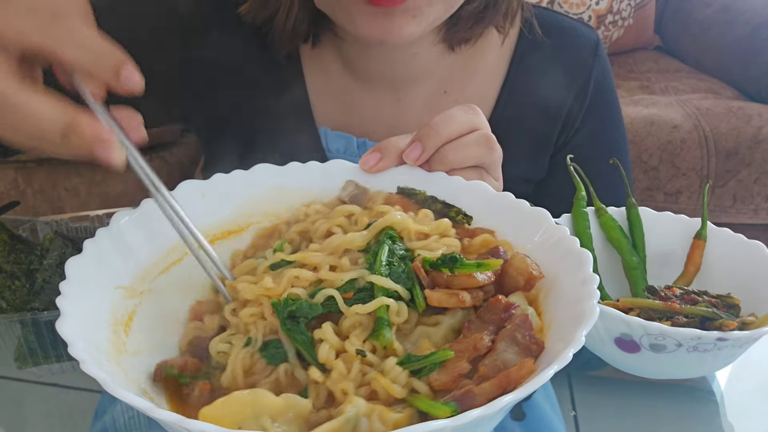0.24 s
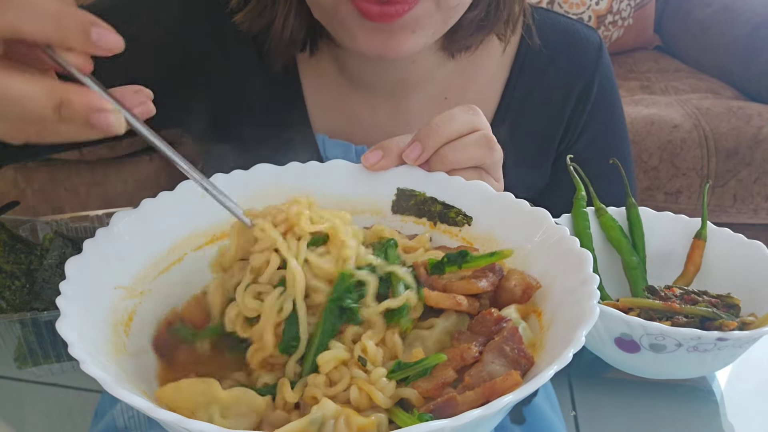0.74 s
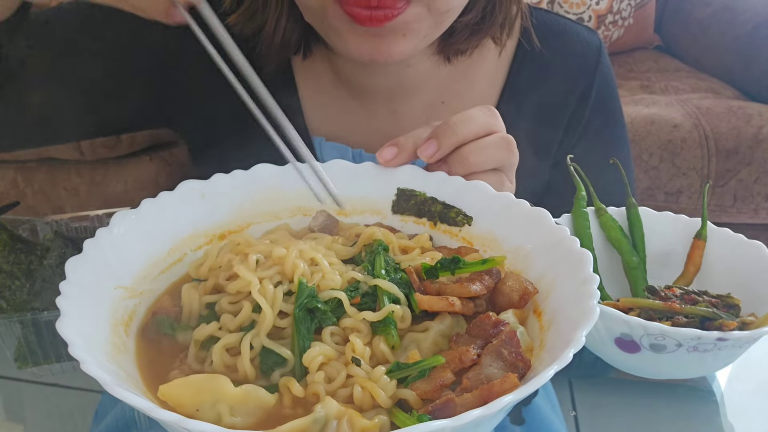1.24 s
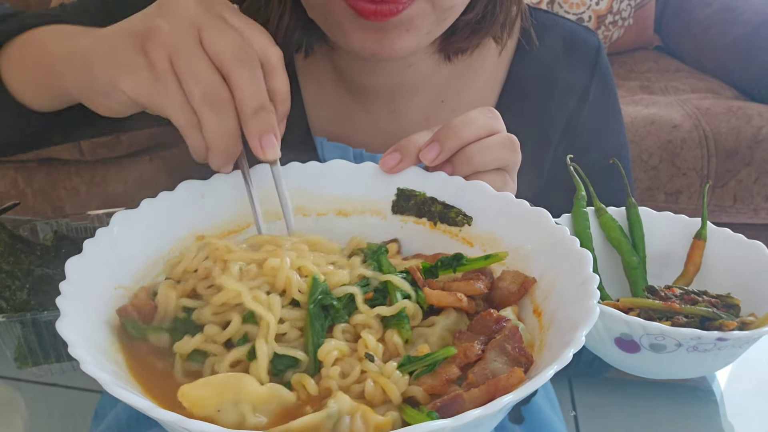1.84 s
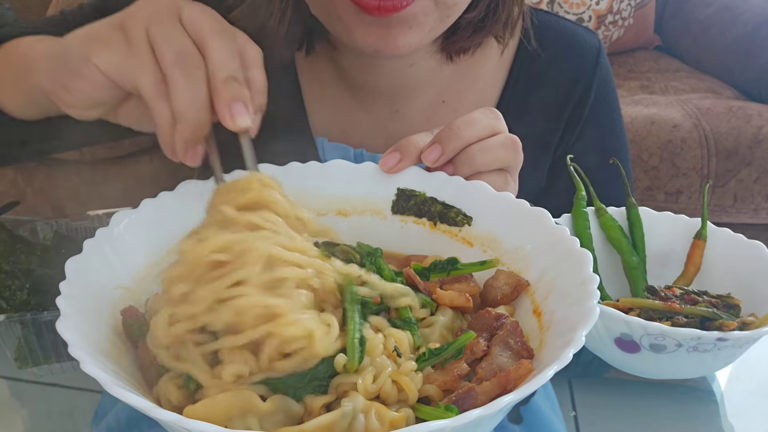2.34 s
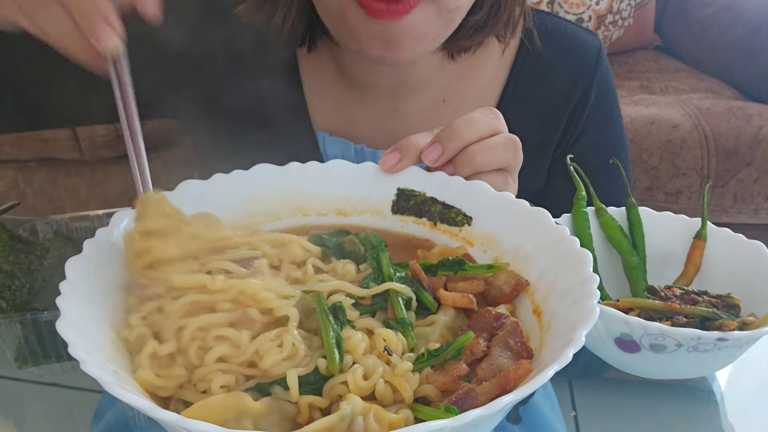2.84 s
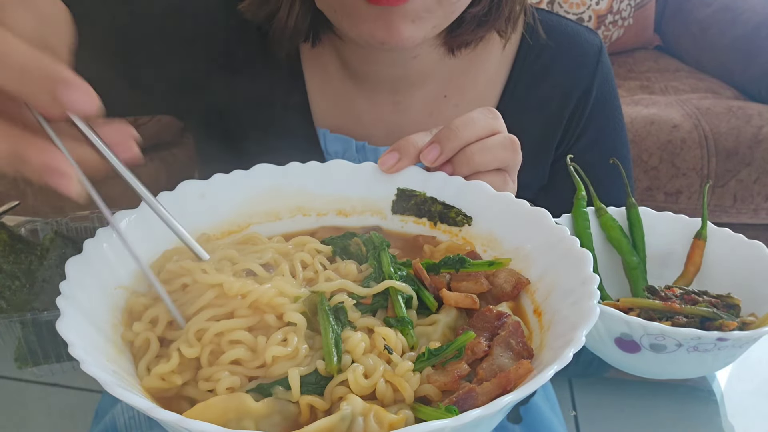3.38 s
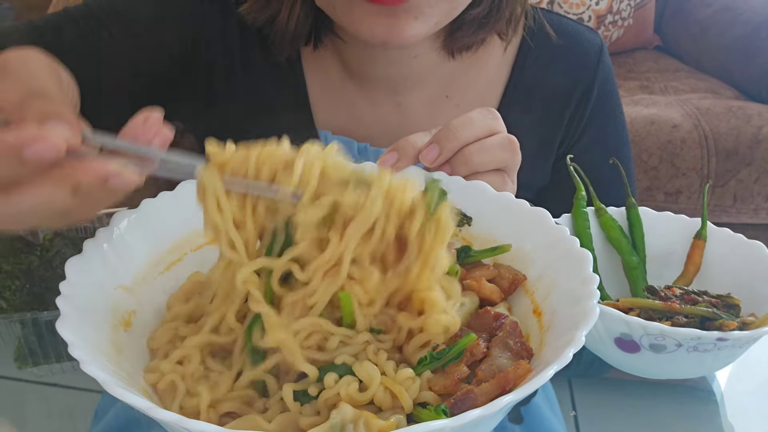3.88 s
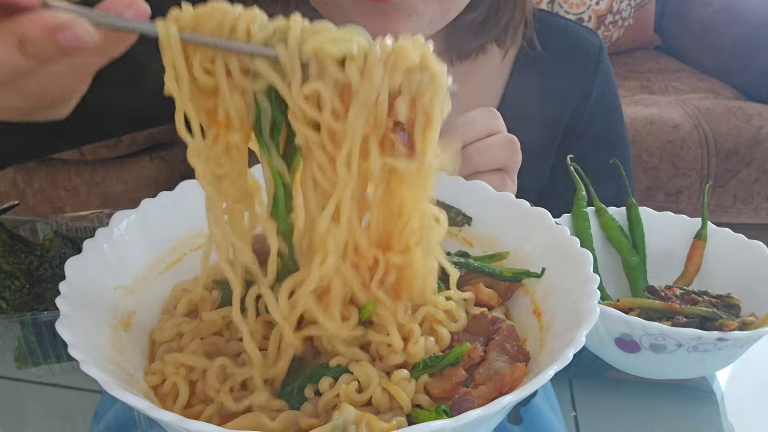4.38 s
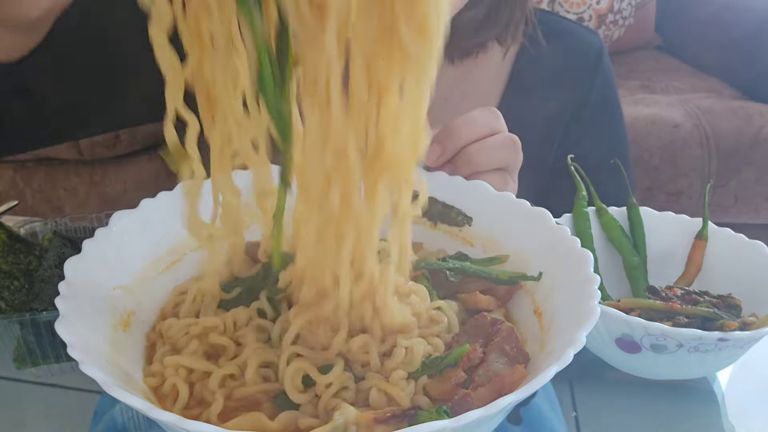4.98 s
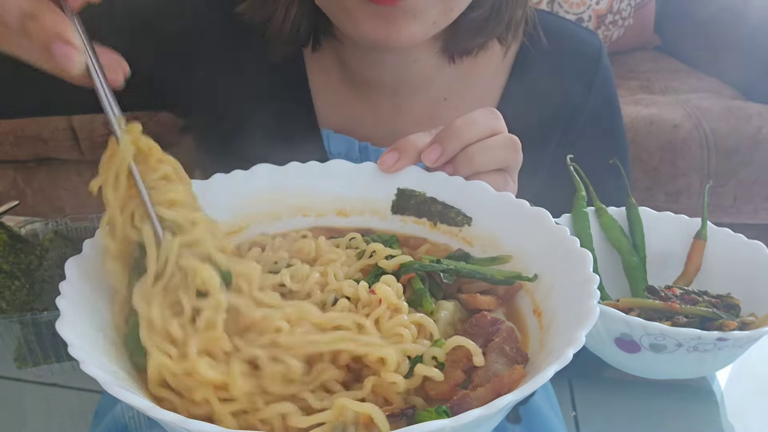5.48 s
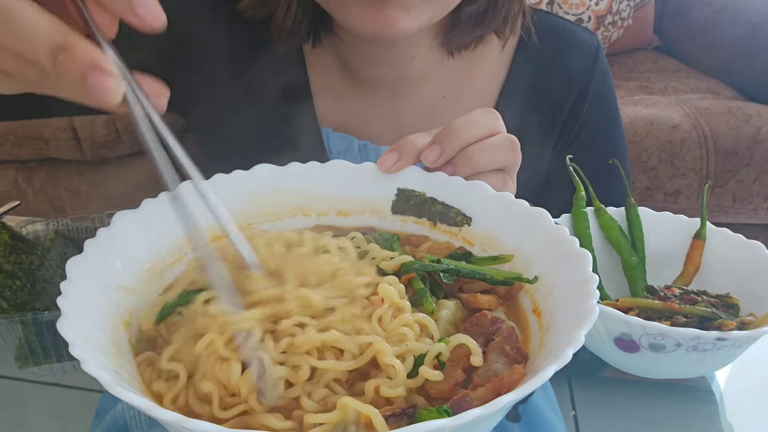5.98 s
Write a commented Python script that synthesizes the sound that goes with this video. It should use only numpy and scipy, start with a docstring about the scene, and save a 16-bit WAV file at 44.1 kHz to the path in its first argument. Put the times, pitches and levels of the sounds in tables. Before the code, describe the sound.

Metal chopsticks clink and scrape a thin bowl while wet noodles pop, tick and rustle close up, over a low room hum.

```python
"""Steel chopsticks knock and slide on a thin glass-ceramic bowl, heard by a pair of close microphones in a living room.
Each touch sets off the bowl's ringing modes, and short noise adds its crack or scratch. Wet noodles pop, tick
and rustle as they part: small air cavities ring briefly over fine random clicks. Shaped noise makes the rumble,
hum and hiss below; they step up in level part way through. A cloud of echoes adds the room."""
import sys
import numpy as np
from scipy import signal
from scipy.fft import rfft, irfft
from scipy.io import wavfile
from scipy.ndimage import uniform_filter1d

SR = 44100
rng = np.random.default_rng(int(sys.argv[2]) if len(sys.argv) > 2 else 0)


def nominal_scale(level):
    """Amplitude ratio for a level in decibels (scalar or array-like)."""
    x = np.asarray(level, float) / 20
    return 10 ** x


def file_out(sig):
    """Save sig as 16-bit WAV at sys.argv[1]."""
    # one column per channel
    cols = np.atleast_2d(sig).T
    # limit, then scale
    lim = np.clip(cols, -1, 1)
    pcm = np.round(lim * 32767).astype(np.int16)
    wavfile.write(sys.argv[1], SR, pcm)


N = 274302  # length in samples

# Knocks of a tip on the bowl; the levels are relative:
# start_s, ring_level_db, left_minus_right_db, crack_db (added to ring_level_db for the crack)
KNOCKS = [(0.2379, -24, -3, -2), (0.3052, -44, -7, 2), (0.3344, -48, -2, -13), (0.3662, -58, -6, -6),
          (1.3154, -23, 5.5, -4), (1.3274, -23, 0, 3.5), (1.3828, -44, -8, 3), (1.4496, -38.5, 1, 9.5),
          (3.4241, -30, 1.5, 5), (6.0352, -15.5, -3.5, -5.5)]


def rms_one(x):
    """Scales a sound so that its average (rms) level is 1."""
    return x / np.sqrt(np.mean(x ** 2) + 1e-20)


def at_hz(points, hz):
    """Reads a curve between its points, along a logarithmic pitch axis."""
    point_hz, value = np.array(points).T
    return np.interp(np.log(hz + 1), np.log(point_hz), value)


def sides(left_minus_right_db):
    """Left and right gains that share out a level difference between the ears."""
    return nominal_scale(np.array([left_minus_right_db, -left_minus_right_db]) / 2)


def grains(per_s, spread_db):
    """Random clicks of uneven size, separate ones in each ear."""
    clicks = (rng.random((2, N)) < per_s / SR) * rng.choice([-1, 1], (2, N))
    extra_db = spread_db * np.minimum(rng.exponential(1, (2, N)), 4)
    return clicks * nominal_scale(extra_db)


def stereo_noise(level_db):
    """Noise of a given spectrum, mostly shared by the ears in the bass and less alike above."""
    # How alike the ears are: pitch_hz, likeness (1 = same, 0 = unrelated, -1 = opposite)
    likeness = [(60, 0.96), (130, 1), (290, 0.96), (640, 0.39), (1410, 0.25), (3100, 0.2), (6820, -0.61),
                (15000, 0.31)]
    # Balance between the ears: pitch_hz, left_minus_right_db
    lean = [(60, -0.5), (130, -3.5), (290, -1.5), (640, -6), (1410, -3), (3100, -3), (6820, -5.5),
            (15000, 7.5)]
    left_lag_s = 0.00019
    hz = np.arange(N // 2 + 1) * SR / N
    mid, side = rfft(rng.standard_normal((2, N)))
    alike = at_hz(likeness, hz)
    pair = np.sqrt(1 + alike) * mid + np.sqrt(1 - alike) * side * [[1], [-1]]
    pair[0] *= np.exp(-2j * np.pi * hz * left_lag_s)
    return irfft(pair * sides(at_hz(lean, hz)) * nominal_scale(level_db(hz)), N)


def background():
    """Rumble and hum share one noise lifted at the room's resonances; a thin hiss lies above."""
    # Broad shape of rumble and hum: pitch_hz, relative_level_db (per Hz)
    hum_shape = [(15, -63), (25, -14.5), (53, 13), (107, -1), (152, -6.5), (256, -1.5), (339, -15),
                 (378, -13.5), (559, -17), (665, -26), (1140, -18), (1450, -27.5), (1930, -26.5),
                 (3040, -38.5), (4500, -63), (5850, -79.5), (9900, -120)]
    # Room resonances: pitch_hz, width_hz, lift_db
    room_peaks = [(51.6, 21, 4), (98.4, 6, 12.5), (121.8, 8.7, 9.5), (240, 25, 0), (322.3, 10, 9.5),
                  (374.4, 14.3, 8.5), (1105, 140, 2.5), (1890, 150, 1)]
    # Shape of the hiss: pitch_hz, relative_level_db (per Hz)
    hiss_shape = [(2060, -24), (3500, 6), (6870, -5), (8240, -1), (10100, -6), (14800, 0), (16100, -8),
                  (16500, -27)]
    step_s, step_blend_s = 2.745, 0.0071  # middle of the level step, and half its length
    split_hz = 175  # rumble below, hum above
    dip_depth_db, dip_width_s = 15, 0.045  # the rumble dips briefly at the step
    since_step_s = np.arange(N) / SR - step_s

    def stepped(before_db, after_db):
        return np.interp(since_step_s, [-step_blend_s, step_blend_s], [before_db, after_db])

    def spectrum(hz):
        lift_db = sum(db / (1 + (2 * (hz - peak_hz) / width_hz) ** 2) for peak_hz, width_hz, db in room_peaks)
        return at_hz(hum_shape, hz) + lift_db

    both = stereo_noise(spectrum)
    rumble = signal.sosfiltfilt(signal.butter(2, split_hz, fs=SR, output="sos"), both)
    hum = both - rumble
    hiss = stereo_noise(lambda hz: at_hz(hiss_shape, hz))
    dip_db = dip_depth_db * np.exp(-(since_step_s / dip_width_s) ** 2)
    rumble = nominal_scale(stepped(-50, -45) - dip_db) * rms_one(rumble)
    hum = nominal_scale(stepped(-49, -43)) * rms_one(hum)
    hiss = nominal_scale(stepped(-78, -71)) * rms_one(hiss)
    return rumble + hum + hiss


def room(x):
    """A dying cloud of echoes, unrelated in the two ears."""
    t60_s, level_db = 0.33, -15  # t60 is the time in which a sound dies by 60 dB
    t = np.arange(SR // 2) / SR
    tail = rng.standard_normal((2, len(t))) * nominal_scale(-60 * t / t60_s)
    tail = tail * (t > 0.004)  # a short gap before the first echoes
    tail = tail / np.sqrt(np.sum(tail ** 2, axis=1, keepdims=True))
    return nominal_scale(level_db) * signal.fftconvolve(x, tail, axes=1)[:, :N]


def pop(hz, t60_s):
    """A film snaps, and the small cavity of air behind it rings a few cycles, climbing in pitch."""
    rise, open_s = 0.062, 0.00015  # strength of the climb; time over which the ring opens
    snap_db, snap_s = -16, 0.00018
    t = np.arange(512) / SR
    ring = np.sin(2 * np.pi * hz * t * (1 + rise * t / t60_s))
    ring = ring * nominal_scale(-60 * t / t60_s) * (1 - np.exp(-t / open_s))
    snap = np.diff(nominal_scale(snap_db - 60 * t / snap_s), prepend=0)
    return ring + snap


def noodles():
    """Parting wet noodles give clear pops, fainter ticks at random pitches and a fine wet rustle."""
    # The clearest pops: start_s, level_db (before scattering), start_pitch_hz, t60_s, left_minus_right_db
    pops = [(0.1087, -30.5, 8600, 0.00088, -7), (.132, -33.5, 4560, 0.0018, 1),
            (.515, -32, 14800, .0009, 8), (0.55, -41, 9610, 0.0021, 8), (0.797, -40, 6200, 0.0019, 3),
            (.859, -39, 9190, 0.0014, -4), (.8803, -46, 4990, .0022, 12), (1.05, -35, 7760, 0.00081, 1),
            (1.82, -44, 7500, .0056, -1), (1.8416, -25, 9760, 0.00041, 9), (1.9324, -42, 6800, .0016, -3),
            (2.0855, -38, 10040, .0011, 14), (2.3419, -43, 9220, 0.0016, -6),
            (2.644, -32, 9620, 0.00061, 5), (2.7587, -19, 4430, 0.00047, 3),
            (2.7861, -40, 2800, 0.0032, -1), (2.8645, -38, 2900, 0.0027, 1), (2.946, -37, 5030, .0032, 10),
            (2.9548, -41, 9800, 0.0017, 12), (3.043, -33, 5230, 0.0023, -6),
            (3.1853, -45, 4060, .0051, -13), (3.2331, -34.5, 3800, 0.0023, 6), (3.244, -38, 4970, .0024, 7),
            (3.254, -39, 5340, 0.0027, -2), (3.2914, -34, 5800, 0.0019, -6), (3.351, -29, 12400, .0013, 12),
            (3.406, -38, 11010, .0016, 6), (3.508, -35, 4680, .003, -2), (3.525, -34.5, 5440, 0.0027, -1),
            (3.5545, -41, 5430, .0025, -9), (3.6617, -32, 8300, 0.0012, 0), (3.7376, -34, 9700, 0.0018, 9),
            (3.8005, -34, 13220, .0011, 9), (3.832, -18.5, 11400, 0.00038, 9),
            (3.8759, -37, 7400, .0023, 6), (3.9347, -29, 11400, 0.00082, 3),
            (3.9649, -36, 11580, .0011, 10), (4.007, -32, 12510, 0.0013, 10),
            (4.022, -28, 9400, 0.00072, -4), (4.133, -32.5, 9900, 0.0017, 12),
            (4.1594, -34, 14820, .0015, 7), (4.455, -44, 8360, .0046, -11), (4.4905, -35, 8060, 0.0043, -9),
            (4.6735, -32, 12700, 0.0013, 18), (4.7616, -39, 8930, 0.0012, 6), (4.897, -38, 8250, .0012, 2),
            (5.034, -38, 4520, .0016, 2), (5.0601, -40, 4460, 0.0027, 7), (5.1663, -32, 7600, 0.0016, -4),
            (5.2099, -40.5, 9600, .0024, 15), (5.225, -34, 6170, .0021, 9), (5.2387, -38, 8270, .0021, -8),
            (5.272, -36, 7850, 0.0043, -10), (5.3257, -26, 13300, 0.00077, 5),
            (5.369, -29, 10100, .00093, 8), (5.5109, -35, 13800, 0.0019, 14),
            (5.768, -35, 13680, .0014, 12), (5.7835, -36, 13550, 0.0012, 10),
            (5.9199, -35, 5440, .0068, -5), (5.9722, -34, 13100, 0.0015, 7)]
    # How busily the noodles are stirred: time_s, rustle_level_db
    stirring = [(0, -74), (.25, -82), (.55, -75.5), (.92, -75), (1.1, -98), (1.8, -74.5), (2.15, -78),
                (2.7, -83), (3.0, -72), (3.14, -84), (3.27, -75.5), (3.6, -65.5), (4.15, -73), (4.35, -76),
                (4.7, -71.5), (5.12, -79), (5.2, -62.5), (5.5, -66), (5.6, -80), (5.8, -76), (6.22, -73)]
    usual_ticks_per_s, usual_stir_db = 260, -77.5
    rate_follows, size_follows = 0.7, 0.31  # share of the rustle's swing in dB
    tick_db, tick_spread_db, tick_cycles = -63, 6, 12.7
    high_left_db = 5.5  # per octave: higher ticks lean left
    scatter_share, scatter_s = 0.42, 0.018  # part of the power lost into the tangle, and its t60
    stir_s, stir_db = np.transpose(stirring)
    rustle_db = np.interp(np.arange(N) / SR, stir_s, stir_db)
    ticks_per_s = usual_ticks_per_s * nominal_scale(rate_follows * (rustle_db - usual_stir_db))

    rows = [tuple(row) for row in pops]
    draws = rng.random((5000, 6))  # possible ticks; a busier rustle keeps more of them
    for when, keep, size, pitch, side, short in draws:
        i = int(when * N)
        if keep < ticks_per_s[i] * N / SR / len(draws):
            hz = 4300 * 3.6 ** (pitch ** 0.8)
            db = tick_db + size_follows * (rustle_db[i] - usual_stir_db)
            db = db - tick_spread_db * np.log(1 - 0.97 * size)
            pan_db = 12 * (side - 0.5) + high_left_db * np.log2(hz / 6500)
            rows.append((when * N / SR, db, hz, tick_cycles * 0.81 ** short / hz, pan_db))

    direct = np.zeros((2, N + 512))
    for start_s, db, hz, t60_s, pan_db in rows:
        i = int(start_s * SR)
        direct[:, i:i + 512] += nominal_scale(db) * sides(pan_db)[:, None] * pop(hz, t60_s)
    tangle = rng.standard_normal((2, 2048)) * nominal_scale(-60 * np.arange(2048) / SR / scatter_s)
    tangle = tangle / np.sqrt(np.sum(tangle ** 2, axis=1, keepdims=True))
    scattered = signal.fftconvolve(direct, tangle, axes=1)[:, :N + 512]
    wet = np.sqrt(1 - scatter_share) * direct + np.sqrt(scatter_share) * scattered

    band = signal.butter(1, [3000, 12000], "band", fs=SR, output="sos")
    rustle = rms_one(signal.sosfilt(band, grains(per_s=6000, spread_db=13.0)))
    return wet[:, :N] + nominal_scale(rustle_db) * rustle


def stroke(start_s, hold_s, level_db, start_change_db, fade_db_per_s):
    """Pressure of one slide: it starts with a bite or more softly, holds, then eases off until the tip leaves."""
    attack_s, settle_s, gone_db = 0.0049, 0.014, 28  # the tip is off once the fade reaches gone_db
    t = np.maximum(np.arange(N) / SR - start_s, 0)
    lost_db = fade_db_per_s * np.maximum(t - hold_s, 0)
    pressure = nominal_scale(level_db + start_change_db * np.exp(-t / settle_s) - lost_db)
    return pressure * np.minimum(t / attack_s, 1) * (lost_db < gone_db)


def touches():
    """Knocks are single pushes and slides are trains of grains; both drive modes and unpitched noise."""
    # Place 0-4 that each knock hits: left wall, far rim, far wall, near floor, front wall
    knock_place = [0, 0, 0, 0, 1, 1, 1, 3, 3, 4]
    # Tips sliding on the glaze, levels relative: start_s, hold_s, level_db,
    # start_change_db (above 0 bites, below 0 starts softly), fade_db_per_s
    slides = [(0.24, 0.098, -50, 23, 293), (1.339, .16, -55.5, 26.5, 400), (1.501, 0.022, -50, -6, 900),
              (1.547, 0.11, -47, -1, 244), (3.432, 0.06, -58, -3, 500), (6.039, 0.038, -48, -9, 139)]
    # Place 0-4 that each slide rubs
    slide_place = [0, 1, 1, 2, 3, 4]
    # Unpitched scratch at each place: relative_level_db, top_hz
    rasp = [(11, 8500), (15, 6700), (11.5, 7200), (13, 12000), (9, 15000)]
    knock_db, slide_db = -15, -30
    force = np.zeros((len(rasp), 2, N))  # place, ear, time
    sharp = np.zeros((2, N))  # drives only cracks and rasps
    for (start_s, db, pan_db, crack_db), place in zip(KNOCKS, knock_place):
        i = round(start_s * SR)
        force[place, :, i] = nominal_scale(db + knock_db) * sides(pan_db)
        sharp[:, i] = nominal_scale(db + crack_db) * sides(pan_db)
    rough = grains(per_s=3000, spread_db=5.5) * nominal_scale(slide_db)
    for row, place in zip(slides, slide_place):
        slide = rough * stroke(*row)
        force[place] += slide
        rasp_db, rasp_hz = rasp[place]
        cut = signal.butter(1, rasp_hz, fs=SR, output="sos")
        sharp += signal.sosfilt(cut, slide + 1e-18) * nominal_scale(rasp_db)  # the tiny offset keeps the filter fast
    return force, sharp


def crack_noise():
    """The many modes too short to tell apart: a snap, then scatter off table and dishes."""
    spread_s, snap_s = 0.0019, 0.017
    wash_db, wash_s = -10.5, 0.075
    t = np.arange(4096) / SR
    fade = nominal_scale(-60 * t / snap_s) + nominal_scale(wash_db - 60 * t / wash_s)
    crack = rng.standard_normal((2, 4096)) * fade * (1 - np.exp(-t / spread_s))
    band = signal.butter(1, [1200, 10900], "band", fs=SR, output="sos")
    return signal.sosfilt(band, crack)


def bowl():
    """Each mode is a close pair that swells and rings, plus a strong, broad, quickly dying splash."""
    # Modes of bowl and sticks: pitch_hz, t60_s (capped for the highest), then relative level_db when touched
    # at left wall, far rim, far wall, near floor, front wall
    modes = [(285, 0.02, 8, -24, -27, -31, -2), (446, 0.18, -16.5, -19, -40, -13, -5.5),
             (987, 0.029, -3.5, -8, -40, -8, -5.5), (1962, 0.042, 2.5, -2, 6, 0.5, -9.5),
             (2204, 0.01, -5.5, -35, -5, 0.5, -41), (2297, 0.16, -2.5, -11, -1, -3.5, -41),
             (2655, 0.065, -2.5, -6, -17, -28, 0), (3010, 0.037, -11, -33, -25, -13.5, -36),
             (3317, 0.1, -8.5, -26, 0.5, -9, -35), (3520, 0.036, -3, -18, 0.5, 2, -41),
             (3820, 0.042, 4.5, -2.5, 4, 10, 3), (4750, 0.012, -2, -17, -4, -2, -30),
             (4950, 0.065, -1.5, -23, -9, 0, 7), (5500, 0.087, 1.5, -22, -4, -2.5, -26),
             (6020, 0.0375, -7, 3.5, -8, -4, -56), (6310, 0.038, -31, 6, -16, -7, 7),
             (6970, 0.021, 1.5, -36, -9, 9.5, 1.5), (7690, 0.028, 1, -17, -16, -11, -21),
             (7760, 0.08, -17, 7.5, -4, 2, -3), (8100, 0.021, 1, 3, -9, 4.5, 0.5),
             (8450, 0.077, -19, -9, -32, -11, -5), (9500, 0.035, -23, -4.5, -37, -6, -12),
             (9760, 0.083, -22, -17, -34, -3, -4), (10550, 0.055, -33, -3, -40, -10, -3),
             (11540, 0.028, -27, -10, -30, -11, -1), (12500, 0.098, -2, 1.5, -35, -1, 1),
             (12700, 0.055, -28, -24, -20, -13.5, -23.5), (14600, 0.094, -4, 5.5, -30, -5, -5),
             (14130, 0.046, -24, -13, -25, -20.5, -1), (14900, 0.055, -23, -20, -32, -20, -16)]
    # How each mode reaches the ears: left_minus_right_db, left_lead_radians
    ears_table = [(4, -0.5), (-3, -0.04), (10.5, -0.5), (-6.5, -0.3), (-32.5, -4), (-0.5, 1.65),
                  (-12, -2.5), (-5, -9), (-0.5, 6), (-16, -2), (-3, -2), (-14, 11.5), (0.5, -7), (2, 3.5),
                  (-6, -2), (-3, -0.5), (-13.5, 10), (2, -6), (-8, -1), (-5, 0.5), (10, -10), (6, 1),
                  (8, 5), (6.5, 7.5), (6, -9), (-3, 8.5), (1, 28.5), (-1, 15), (2, -4), (-10, -13)]
    split, weak_db = 0.0016, -2.5  # pitch gap within the pair as a fraction; level of the second mode
    splash_db, splash_s = 2.5, 0.0047
    swell_s = 0.00078
    pressed_db = 7  # a pressing tip mutes the clear modes and favours the splash
    roam_db = 4.0  # a sliding tip crosses the mode's nodes
    blur_hz, blur_s, blur_db = 8200, 0.011, 2.0  # t60 limit and added level above blur_hz
    force, sharp = touches()
    out = np.zeros((2, N))
    # work only on the stretches around a touch
    busy = np.flatnonzero(uniform_filter1d(np.abs(force).sum(axis=(0, 1)), 16384) > 1e-9)
    force = force[:, :, busy]
    blows = np.isin(busy, [round(row[0] * SR) for row in KNOCKS])
    muted = nominal_scale(np.where(blows, 0, -pressed_db))
    steps = np.arange(0, N + 1024, 1024)
    other = np.array([[1], [1j]])  # the second mode and the splash radiate in another pattern
    for (hz, t60_s, *place_db), (lean_db, lead) in zip(modes, ears_table):
        start_phase = np.exp(2j * np.pi * rng.random((len(force), 1, 1)))
        ears = (sides(lean_db) * np.exp([1j * lead, 0]))[:, None]
        drive = ears * np.sum(force * start_phase * nominal_scale(place_db)[:, None, None], axis=0)
        roam = np.interp(busy, steps, rng.standard_normal(len(steps)))
        drive = drive * nominal_scale(np.where(blows, 0, roam_db * roam))
        if hz > blur_hz:  # up here the modes lie so close that no single one rings on
            t60_s = min(t60_s, blur_s)
            drive = drive * nominal_scale(blur_db)
        first = (hz, t60_s, muted)
        second = (hz * (1 + split), t60_s, nominal_scale(weak_db) * other * muted)
        splash = (hz * (1 - split), splash_s, nominal_scale(splash_db) * other / muted)
        for ring_hz, ring_s, gain in (first, second, splash):
            turn = np.exp(2j * np.pi * ring_hz / SR)
            swell = np.exp(-1 / (swell_s * SR))
            # one pole sets the decay, the other delays the ring's full strength
            poles = np.poly([turn * nominal_scale(-60 / (ring_s * SR)), turn * swell])
            out[:, busy] += signal.lfilter([1 - swell], poles, gain * drive + 1e-18).imag
    return out + signal.fftconvolve(sharp, crack_noise(), axes=1)[:, :N]


def scene():
    """Bowl and noodles in the room, over the background."""
    near = bowl() + noodles()
    return near + room(near) + background()


def band_limit(x):
    """A steep low-pass at the top of the band."""
    return signal.sosfilt(signal.butter(12, 17000, fs=SR, output="sos"), x)


def record(dry):
    """A steep low-pass filter cuts the top of the treble."""
    dull = signal.sosfilt(signal.butter(8, 16000, fs=SR, output="sos"), dry)
    return band_limit(dull)


dry = scene()
out = record(dry)
file_out(out)
```